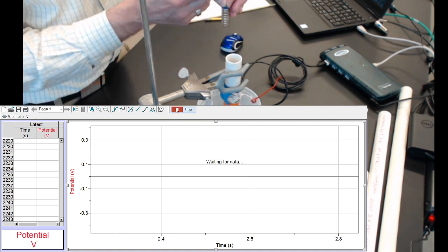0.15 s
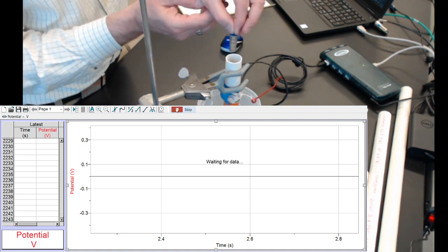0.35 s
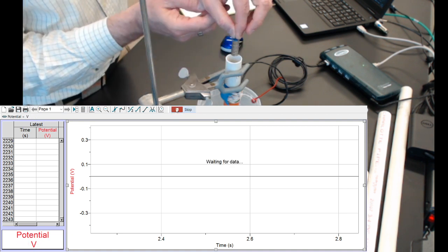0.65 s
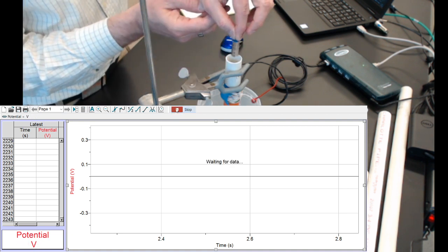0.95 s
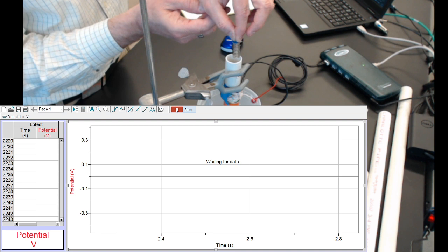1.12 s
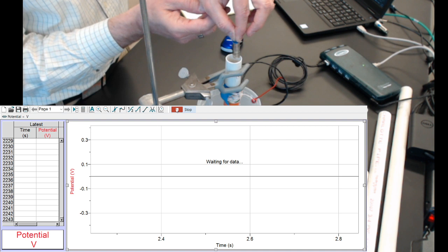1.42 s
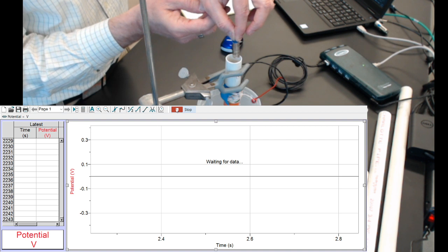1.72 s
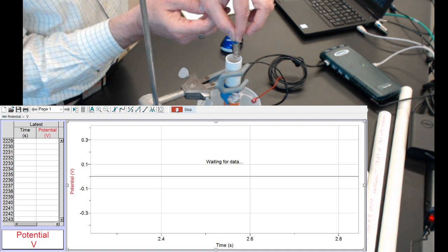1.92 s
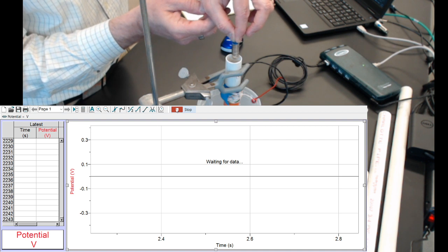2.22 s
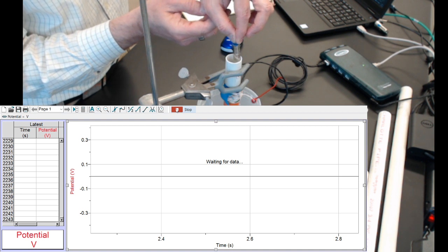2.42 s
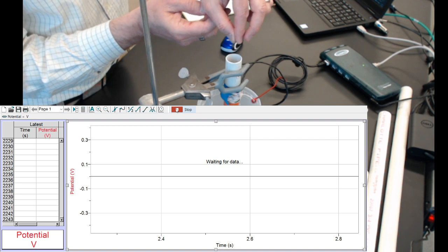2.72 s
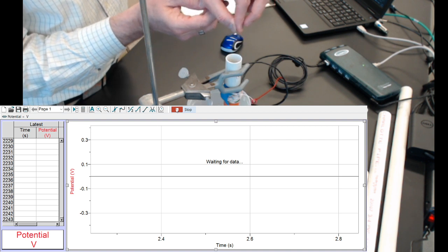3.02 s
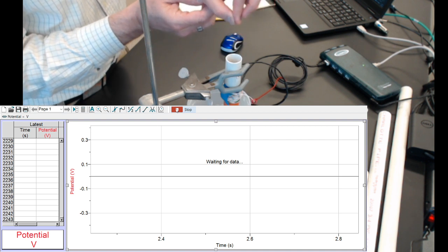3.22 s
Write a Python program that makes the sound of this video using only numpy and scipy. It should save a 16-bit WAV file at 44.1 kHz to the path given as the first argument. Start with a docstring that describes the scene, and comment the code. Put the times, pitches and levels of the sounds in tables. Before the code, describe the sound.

Small magnets drop down a plastic tube, landing with a sharp clack and brief rattle.

```python
"""Magnets down a tube

A stack of small magnets slips from the fingers, scrapes down a clamped plastic tube and lands with a
clack that sets the stand ringing faintly. It rattles, bounces once and settles, each contact a bright
click over a hollow knock. Underneath is a small room: ventilation rumble, electronic hiss and whine."""
import sys
import numpy as np
from scipy import signal
from scipy.fft import rfft, irfft, next_fast_len
from scipy.io import wavfile
from scipy.ndimage import uniform_filter1d

SR = 44100
rng = np.random.default_rng(int(sys.argv[2]) if len(sys.argv) > 2 else 0)


def materialize(psi):
    """Save the field psi as 16-bit PCM at rate SR to the path in sys.argv[1].

    A 1-D psi becomes a single channel; in a 2-D psi each row is a channel.
    """
    bounded = np.clip(np.atleast_2d(psi).T, -1, 1)
    quanta = np.round(bounded * 32767).astype(np.int16)
    wavfile.write(sys.argv[1], SR, quanta)


N = 147735

# hits of the stack in the tube: t/s, knock level/dB, click level/dB
STACK_HITS = [(2.7696, -20, -29), (2.7723, -13.5, -22.5), (2.775, -16.5, -19), (2.7842, -26.5, -20.5),
              (2.7877, -25.5, -18), (2.8039, -32, -20.5), (2.8076, -31, -23.5), (2.8108, -22.5, -28),
              (2.8212, -39, -24.5), (2.8332, -43, -22.5), (2.839, -38, -23), (2.842, -37, -29.5),
              (2.8761, -37, -31.5), (2.89, -42, -40), (2.933, -36, -38), (2.9433, -36, -35),
              (2.9555, -29, -31), (2.9602, -40, -31.5), (2.971, -29, -57), (2.9743, -46, -34),
              (2.983, -36, -34), (2.9856, -44, -39), (3.041, -40, -44), (3.0735, -36.5, -38),
              (3.077, -39.5, -39.5), (3.112, -51, -43.5), (3.146, -46, -47.5)]
# hollow body of a hit: f/Hz, level/dB
KNOCK_EQ = [(40, -34), (120, -28), (250, -4), (380, -1), (560, 5), (800, -9), (920, -7), (1450, -4),
            (1850, -18), (2300, -16.5), (3500, -18), (6000, -27), (12000, -45)]
# hard, bright edge of a hit: f/Hz, level/dB
CLICK_EQ = [(100, -16), (800, -5.5), (1800, -1), (3000, -0.5), (3700, -1.5), (4250, -6.5), (5000, 1),
            (5900, 0.5), (7300, -2.5), (9000, 1), (10500, -1.5), (12000, -9.5)]
# modes of the tube and its base: f/Hz, level/dB, t60/s
TUBE_MODES = [(250, -13, .04), (414, -10, 0.021), (551, -3.5, 0.042), (627, 1.5, 0.03), (789, -4.5, 0.042),
              (980, -11, .02), (1420, -12, 0.042), (1610, -9, 0.039), (2190, -20, 0.048)]
# lingering modes of the stand: f/Hz, level/dB, t60/s
STAND_MODES = [(498, -3, 0.34), (549, -2.5, .4), (616, -1.5, 0.4), (782, -4, .25), (1270, -6, 0.34),
               (1493, -3, 0.18), (1700, -1, 0.25), (1960, -9, 0.38), (2235, -3, 0.21), (3080, -8, 0.28),
               (3590, -4.5, 0.22), (5660, -10, 0.33), (5928, -12, 0.39), (6735, -11, .34),
               (8860, -19, 0.31)]
# raps on the side wall: t/s, level/dB
WALL_RAPS = [(3.0423, -40), (3.0723, -28.5), (3.082, -29.5), (3.113, -45), (3.147, -42)]
# tone of the rapped wall: f/Hz, level/dB
WALL_EQ = [(100, -17), (350, -1), (510, 6), (640, 10.5), (780, -11), (1080, -3), (1500, -10), (2250, -10.5),
           (3500, -30), (6000, -32), (12000, -41)]
# light ticks of the magnets in the fingers: t/s, level/dB
FINGER_TICKS = [(0.0168, -33), (2.709, -38.5), (2.753, -55)]
# thin tone of a tick: f/Hz, level/dB
TICK_EQ = [(200, -38), (4000, -22), (6200, -7), (7300, 5), (8200, -1), (9500, 7.5), (12000, -1)]
# scrapes along the wall: start t/s, end t/s, level/dB the grit swells to
WALL_SCRAPES = [(2.747, 2.774, -42.5), (2.918, 2.949, -44.5)]
# squeaks against the rim: t/s, length/s, f/Hz, level/dB
RIM_SQUEAKS = [(0.137, .07, 6580, -63), (1.743, .11, 4686, -63)]
# ventilation rumble: f/Hz, level/dB
RUMBLE_EQ = [(18, -88), (30, -64), (80, -21), (96, -15), (118, -0.5), (151, -7), (178, -3), (223, -5),
             (252, -10), (279, -6.5), (388, -16), (447, -17.5), (506, -23), (538, -22), (647, -23),
             (778, -28.5), (897, -39.5), (994, -31), (1150, -31), (1470, -36), (1840, -37), (2500, -43),
             (4000, -46.5), (5200, -76), (8800, -120)]
# fader ride of the rumble: t/s, level/dB
RUMBLE_RIDE = [(0, -41), (.6, -41.5), (1.0, -41), (1.36, -39.5), (1.55, -40.5), (2.7, -40), (3.3, -39.8)]
# hiss of the electronics: f/Hz, level/dB
HISS_EQ = [(1500, -7), (3900, -14), (4400, -2), (5400, 1.5), (5900, -1), (6300, -1), (7000, -2.5),
           (8300, -5), (9300, -4.5), (10800, -10.5), (12000, -20.5)]
# fader ride of the hiss: t/s, level/dB
HISS_RIDE = [(0, -54), (.25, -57), (.5, -59.5), (1.2, -61), (3.3, -58.5)]
# whine of the electronics: f/Hz, level/dB
WHINE_TONES = [(4705, -80), (6121, -74)]
# reverb time of the room: f/Hz, t60/s
ROOM_DECAY = [(150, 0.82), (500, 0.55), (2000, 0.51), (6000, 0.51), (11000, 0.33)]
# top-end roll-off of the microphone: f/Hz, level/dB
MIC_EQ = [(10500, 0), (11200, -2.5), (11650, -10.5), (12000, -32)]

CLICK_T60_S, KNOCK_T60_S, CHATTER_T60_S = 0.016, 0.034, 0.082
TUBE_DB, STAND_DB, CHATTER_DB = -11, -21, -11.5  # relative to the hit they belong to
KNOCK_WET_DB, CLICK_WET_DB = -7, -5.5
LANDING_S, LANDING_DB, LANDING_RISE_S = 2.776, -7, 0.0012
LOW_CUT_HZ, TOP_HZ = 90, 12300
TAIL_SAMPLES = SR * 3 // 4


def rattle():
    """Each contact is a hard click with brief chatter, over a knock that rings the tube."""
    out, t = np.zeros(N), np.arange(TAIL_SAMPLES) / SR
    attack = 1 - np.exp(-t / 0.00023)
    for s, knock_db, click_db in STACK_HITS:
        knock = noise(KNOCK_EQ, len(t)) * fade(t, KNOCK_T60_S)
        knock += amp(TUBE_DB) * ring(TUBE_MODES, t, scatter_db=1)
        chatter = amp(CHATTER_DB) * fade(t, CHATTER_T60_S)
        click = noise(CLICK_EQ, len(t)) * (fade(t, CLICK_T60_S) + chatter)
        add(out, s, amp(knock_db) * in_room(attack * knock, KNOCK_WET_DB))
        add(out, s, amp(click_db) * in_room(attack * click, CLICK_WET_DB))
    return out


def landing():
    """The full weight meets the bottom: the tube thuds and the stand rings on."""
    out, t = np.zeros(N), np.arange(TAIL_SAMPLES) / SR
    attack = 1 - np.exp(-t / LANDING_RISE_S)
    thud = in_room(attack * ring(TUBE_MODES, t, scatter_db=1.5), wet_db=-12.5)
    stand = amp(STAND_DB) * attack * ring(STAND_MODES, t, scatter_db=3)
    add(out, LANDING_S, amp(LANDING_DB) * (thud + stand))
    return out


def wall_raps():
    """The stack leans over and raps the side wall: short, boxy bursts."""
    out, t = np.zeros(N), np.arange(TAIL_SAMPLES) / SR
    attack = 1 - np.exp(-t / 0.00023)
    for s, db in WALL_RAPS:
        rap = attack * noise(WALL_EQ, len(t)) * fade(t, t60=0.027)
        add(out, s, amp(db) * in_room(rap, wet_db=-2.5))
    return out


def finger_ticks():
    """The magnets tick thinly between the fingers."""
    out, t = np.zeros(N), np.arange(SR // 2) / SR
    for s, db in FINGER_TICKS:
        tick = noise(TICK_EQ, len(t)) * fade(t, t60=0.02)
        add(out, s, amp(db) * in_room(tick, wet_db=-6))
    return out


def scrapes():
    """The stack slides along the wall: bright grit and a hollow body swell, then cut off."""
    out, t = np.zeros(N), np.arange(SR // 2) / SR
    for start, end, db in WALL_SCRAPES:
        swell = t / (end - start) * (t < end - start)
        grain_db = 3.4 * unit(uniform_filter1d(rng.standard_normal(len(t)), size=60))
        grit = noise(CLICK_EQ, len(t)) * unit(amp(grain_db))
        add(out, start, amp(db) * in_room(grit * swell, CLICK_WET_DB))
        body = noise(KNOCK_EQ, len(t))
        add(out, start, amp(db + 1) * body * swell)
    return out


def squeaks():
    """The magnets rub the rim: faint, rough friction tones that swell and fade."""
    out = np.zeros(N)
    for s, length, pitch_hz, db in RIM_SQUEAKS:
        size = round(length * SR)
        add(out, s, amp(db) * np.hanning(size) * noise_band(pitch_hz, size, width_hz=60))
    return out


def electronics():
    """A soft hiss and a thin whine, made slightly unsteady by drifting phase."""
    t = np.arange(N) / SR
    out = ride(HISS_RIDE) * noise(HISS_EQ, N)
    for hz, db in WHINE_TONES:
        drift = 0.0304 * np.cumsum(rng.standard_normal(N))
        out += amp(db) * unit(np.sin(2 * np.pi * hz * t + drift))
    return out


def ventilation():
    """A bed of broad rumble with a low, wavering drone."""
    drone = amp(-51) * noise_band(centre_hz=118, size=N, width_hz=9)
    return ride(RUMBLE_RIDE) * noise(RUMBLE_EQ, N) + drone


def in_room(x, wet_db):
    """The dry sound plus a diffuse tail that blooms fast and lasts longest in the lows."""
    hz, t, bands = signal.stft(rng.standard_normal(TAIL_SAMPLES), SR, nperseg=256)
    decay = fade(t, along(ROOM_DECAY, hz)[:, None])
    bloom = 1 - np.exp(-t / 0.002)
    tail = signal.istft(bands * decay * bloom, SR, nperseg=256)[1]
    return x + amp(wet_db) * signal.fftconvolve(x, tail / np.linalg.norm(tail))[:len(x)]


def ring(modes, t, scatter_db):
    """Damped modes, with fresh levels and phases on every strike."""
    return sum(amp(db + scatter_db * rng.standard_normal()) * fade(t, t60)
               * np.sin(2 * np.pi * (hz * t + rng.random())) for hz, db, t60 in modes)


def noise(eq, size):
    """Noise coloured by an EQ curve, at rms 1."""
    return unit(filtered(rng.standard_normal(size), lambda hz: amp(along(eq, hz))))


def noise_band(centre_hz, size, width_hz):
    """A narrow bell of noise, heard as a rough pitch, at rms 1."""
    white = rng.standard_normal(size)
    return unit(filtered(white, lambda hz: np.exp(-((hz - centre_hz) / width_hz) ** 2)))


def filtered(x, response):
    """Shape x with a gain that depends on frequency."""
    size = next_fast_len(len(x) + 8192)
    return irfft(rfft(x, size) * response(np.fft.rfftfreq(size, 1 / SR)), size)[:len(x)]


def along(points, hz):
    """Read a curve on a log frequency axis."""
    freqs, values = np.transpose(points)
    return np.interp(np.log(hz + 1), np.log(freqs + 1), values)


def ride(points):
    """Fader moves as a gain for every sample."""
    return amp(np.interp(np.arange(N) / SR, *np.transpose(points)))


def fade(t, t60):
    """Exponential decay, 60 dB down at t60."""
    return np.exp(-np.log(1000) * t / t60)


def amp(db):
    """Decibels to gain."""
    return 10 ** (np.asarray(db) / 20)


def unit(x):
    """Scale to rms 1."""
    return x / np.sqrt(np.mean(x ** 2) + 1e-20)


def add(track, s, x):
    """Mix x into the track at s seconds."""
    part = track[max(round(s * SR), 0):][:len(x)]
    part += x[:len(part)]


def scene():
    """The mono mix; the hits get a low cut, as the light tube radiates little deep bass."""
    low_cut = signal.butter(1, LOW_CUT_HZ, btype="high", fs=SR, output="sos")
    hits = signal.sosfilt(low_cut, rattle() + landing() + wall_raps())
    return (hits + finger_ticks() + scrapes() + squeaks() + electronics() + ventilation())[None]


def record(dry):
    """The microphone rolls off steeply at its band limit."""
    return filtered(dry[0], lambda hz: amp(along(MIC_EQ, hz)) * (hz < TOP_HZ))[None]


dry = scene()
out = record(dry)
materialize(out)
```